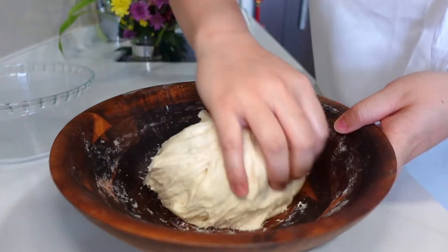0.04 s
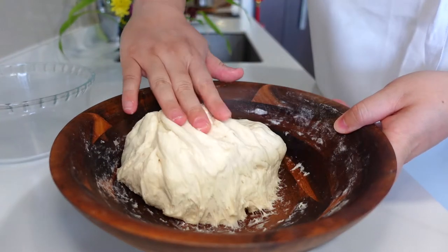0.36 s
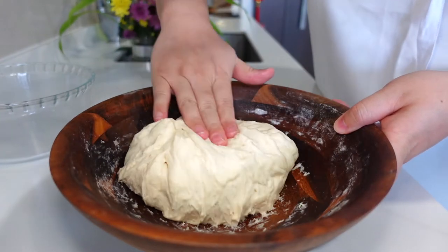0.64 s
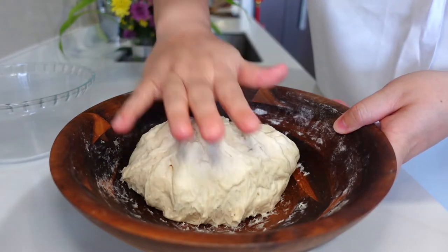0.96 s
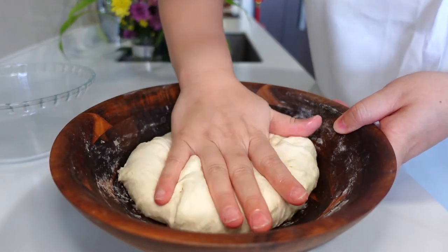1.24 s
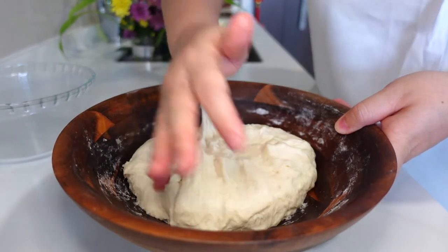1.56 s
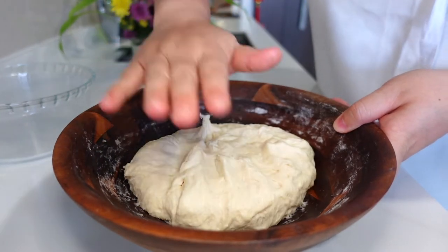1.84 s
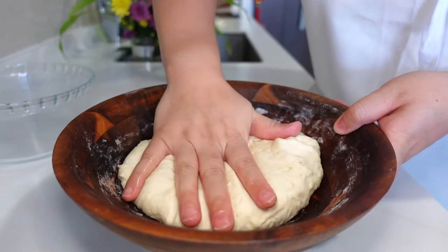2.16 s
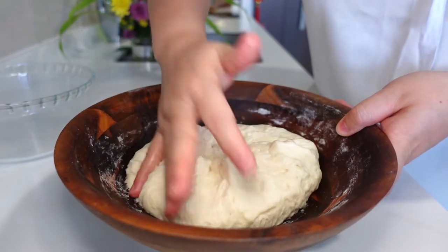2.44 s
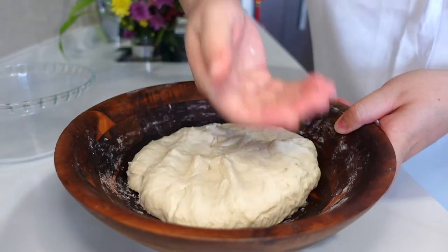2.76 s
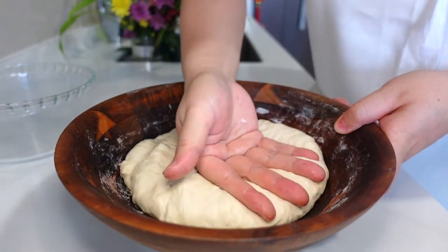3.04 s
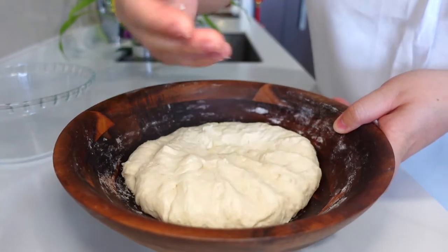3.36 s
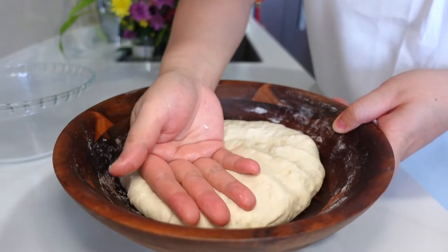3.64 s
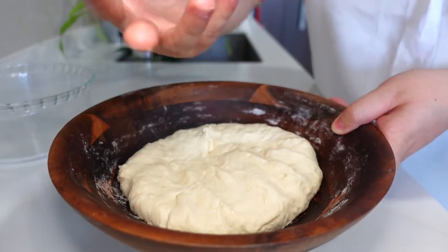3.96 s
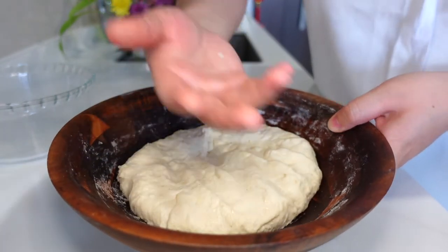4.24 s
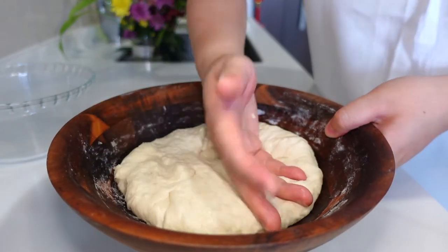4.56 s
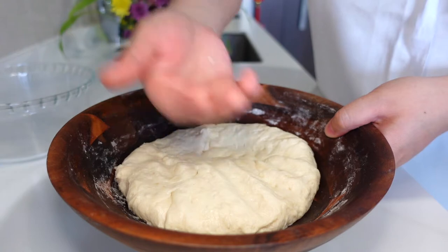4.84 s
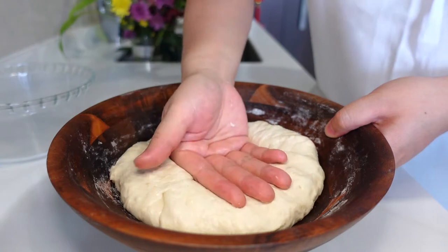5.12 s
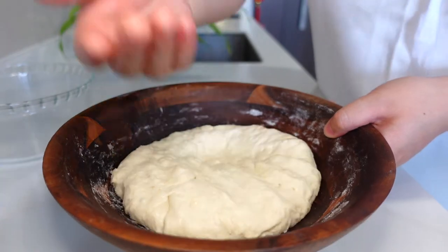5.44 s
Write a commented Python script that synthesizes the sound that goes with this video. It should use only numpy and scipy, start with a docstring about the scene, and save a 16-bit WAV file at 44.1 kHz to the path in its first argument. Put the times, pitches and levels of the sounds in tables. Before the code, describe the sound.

Close, irregular slaps of a hand on tacky dough ring briefly in a kitchen, among small sticky ticks and a low hum.

```python
"""An open hand slaps a ball of soft dough flat in a wooden bowl, close by, in a hard-walled kitchen.
Each impact cracks on the skin and excites the resonances of the bowl; some pop a pocket of trapped air.
Between slaps the tacky dough rubs, peels and ticks as its bonds with the skin break, over a low hum.
Automatic gain control flattens the hardest slaps, so that their echo stands as loud as the blow."""
import sys
import numpy as np
from scipy import signal
from scipy.fft import rfft, irfft, next_fast_len
from scipy.io import wavfile
from scipy.ndimage import uniform_filter1d, minimum_filter1d

SR = 44100
rng = np.random.default_rng(int(sys.argv[2]) if len(sys.argv) > 2 else 0)


def transcribe(signal):
    """Save signal, clipped to [-1, 1], as a 16-bit WAV file at the path in sys.argv[1]."""
    frames = np.atleast_2d(signal).T
    limited = np.clip(frames, -1, 1)
    pcm = np.round(limited * 32767).astype(np.int16)
    wavfile.write(sys.argv[1], SR, pcm)


N = 250929


def amp(db):
    """Amplitude ratio: a factor of ten for every 20 dB."""
    return 10 ** (np.asarray(db) / 20)


def unit_rms(x):
    """Normalisation to an rms of 1."""
    return x / np.sqrt(np.mean(x ** 2) + 1e-20)


def curve_at(points, hz):
    """Interpolation of a table on a logarithmic frequency axis."""
    frequency, value = np.transpose(points)
    return np.interp(np.log(hz + 1), np.log(frequency + 1), value)


def colour(x, points):
    """Zero-phase filtering by a table of (frequency [Hz], gain [dB])."""
    hz = np.fft.rfftfreq(x.shape[-1], 1 / SR)
    return irfft(rfft(x) * amp(curve_at(points, hz)), x.shape[-1])


def diffuse_field(pair, side_db):
    """Partial coherence: two independent signals mix as mid and side, as at two nearby points."""
    width = amp(curve_at(side_db, np.fft.rfftfreq(pair.shape[-1], 1 / SR)))
    mid, side = rfft(pair) * np.array([np.ones_like(width), width]) / np.sqrt(1 + width ** 2)
    return irfft(np.array([mid + side, mid - side]), pair.shape[-1])


# spectrum of the hum: (frequency [Hz], relative spectral density [dB])
HUM_SPECTRUM = [(25, -71), (45, -11), (85, -11.5), (125, 2), (210, -4.5), (300, -5), (410, -15.5),
                (520, -13), (750, -17.5), (1350, -16.5), (2200, -21), (3300, -30), (7000, -36.5),
                (16000, -48.5)]
# stereo width of the hum: (frequency [Hz], side minus mid [dB])
HUM_WIDTH = [(60, -61), (150, -24.5), (380, -8), (950, -4), (2380, -3), (5980, 1.5), (15000, -6)]
def room_hum(level_db=-48):
    """Stationary noise: a steady, diffuse hum with most of its power at low frequencies."""
    noise = colour(rng.standard_normal((2, next_fast_len(N))), HUM_SPECTRUM)
    return amp(level_db) * unit_rms(diffuse_field(noise, HUM_WIDTH))[:, :N]


# decay of the kitchen: (frequency [Hz], reverberation time T60 [s])
REVERB_TIMES = [(100, 0.66), (300, 0.64), (800, 0.59), (2500, 0.69), (5000, 0.71), (9000, 0.52),
                (15000, 0.36)]
# colour of the reverberation: (frequency [Hz], gain [dB])
REVERB_SPECTRUM = [(60, -8.5), (130, -1), (300, 0.5), (1000, 0), (3000, -2.5), (7000, -5.5), (15000, 2.5)]
# stereo width of the reverberation: (frequency [Hz], side minus mid [dB])
REVERB_WIDTH = [(60, -46), (150, -72), (380, -19), (950, -10.5), (2380, -7.5), (5980, -5.5), (15000, -7.5)]
def kitchen_reverb(build_s=0.0068):
    """Reverberation: a diffuse impulse response builds up, then decays exponentially in each band."""
    hz, t, spectra = signal.stft(rng.standard_normal((2, 2 ** 15)), SR, nperseg=256)
    decay = amp(-60 * t / curve_at(REVERB_TIMES, hz)[:, None])
    tail = signal.istft(spectra * decay, SR, nperseg=256)[1]
    tail *= 1 - np.exp(-(np.arange(tail.shape[1]) / SR / build_s) ** 2)
    return colour(diffuse_field(tail / np.linalg.norm(tail[0]), REVERB_WIDTH), REVERB_SPECTRUM)


def add(mix, start_s, sound):
    """Superposition: a sound sums into the mix from its start time on."""
    part = mix[max(round(start_s * SR), 0):][:len(sound)]
    part += sound[:len(part)]


# reflections from counter, bowl rim and body: (delay [s], gain [ratio])
REFLECTIONS = [(.0031, 0.55), (.0046, 0.24), (.0070, 0.33), (0.0109, 0.19)]
def with_reflections(x, cutoff_hz=3500):
    """Early reflection: near surfaces add delayed, duller copies to the direct sound."""
    out = x.copy()
    dulled = signal.lfilter(*signal.butter(1, cutoff_hz, fs=SR), x)
    for delay_s, gain in REFLECTIONS:
        add(out, delay_s, gain * dulled)
    return out


# quick peels of skin off dough: (centre time [s], half length [s], relative level [dB])
PEEL_STROKES = [(.005, 0.048, -40.5), (0.803, 0.045, -54.5), (1.403, 0.056, -49.5), (1.545, 0.054, -43.5),
                (2.224, 0.051, -50), (2.463, 0.063, -43.5), (3.23, 0.034, -43), (3.901, 0.033, -43.5),
                (4.635, 0.044, -43.5), (5.236, 0.026, -43)]
# slow drags of the resting hand: (centre time [s], half length [s], relative level [dB])
DRAG_STROKES = [(0.12, 0.14, -52.5), (0.426, 0.23, -66), (1.286, 0.11, -57.5), (3.035, 0.087, -62.5),
                (5.056, 0.041, -59.5), (5.619, 0.039, -59)]
# spectrum of the parting bonds: (frequency [Hz], gain [dB])
PEEL_SPECTRUM = [(400, -1), (1200, -1), (2500, 0.5), (4000, 6), (7000, 3), (10000, -1.5), (13000, -8),
                 (16000, -13)]
def peeling(grains_per_s=7000, spread_db=3, threads_per_s=70, thread_db=13, untilted_db=-44.5):
    """Shot noise: countless tiny adhesive bonds let go in soft swells, among a few thicker threads."""
    # spectral tilt in dB per octave: louder peels are duller, and all drags are bright
    strokes = [(s, half_s, db, -0.7 * (db - untilted_db)) for s, half_s, db in PEEL_STROKES]
    strokes += [(s, half_s, db, 3) for s, half_s, db in DRAG_STROKES]
    t, out = np.arange(N) / SR, np.zeros(N)
    for centre_s, half_s, level_db, tilt in strokes:
        span = t[abs(t - centre_s) < 3 * half_s]
        n = len(span)
        grains = rng.standard_normal(n) * (rng.random(n) < grains_per_s / SR)
        grains *= amp(spread_db * np.minimum(rng.exponential(1, n), 4))
        thread_sizes = amp(thread_db) * np.sin(2 * np.pi * rng.random(n))
        grains += thread_sizes * (rng.random(n) < threads_per_s / SR)
        fizz = colour(grains, [(hz, db + tilt * np.log2(hz)) for hz, db in PEEL_SPECTRUM])
        swell = np.exp(-((span - centre_s) / half_s) ** 2)
        add(out, span[0], amp(level_db) * unit_rms(fizz) * swell)
    return out


def fine_threads(per_s=30, level_db=-36, spread_db=1.5, hz=6300, spread_octaves=0.44):
    """Jittered pulse train of threads parting in each drag: (time [s], level [dB], frequency [Hz])."""
    for centre_s, half_s, _ in DRAG_STROKES:
        for k, (late, softer, pitch) in enumerate(rng.uniform(-0.87, 1, (24, 3))):
            time_s = max(centre_s - half_s, 0) + (k + 0.5 + 0.5 * late) / per_s
            if time_s < centre_s + half_s:
                yield time_s, level_db - spread_db * softer, hz * 2 ** (spread_octaves * pitch)


# the thickest threads and bubbles snap singly: (time [s], relative level [dB], frequency [Hz])
THICK_SNAPS = [(0.2261, -30.5, 4200), (0.322, -24.5, 10600), (0.6487, -26, 8300), (1.281, -30.5, 3930),
               (2.121, -31.5, 7500), (3.0090, -27.5, 4750), (3.080, -32.5, 5330), (3.569, -18.5, 2660),
               (4.3644, -27, 2117), (4.952, -22, 3800), (5.2306, -15.5, 3500), (5.572, -14.5, 4200),
               (5.581, -20.5, 3600)]
def snapping(decay_cycles=0.63, tear_s=0.0024, tear_db=-16, gain_db=1, band_hz=(1100, 12000)):
    """Damped oscillation: a breaking thread clicks for about one cycle, and its ends tear on briefly."""
    t, out = np.arange(512) / SR, np.zeros(N)
    for time_s, level_db, hz in THICK_SNAPS + list(fine_threads()):
        click = np.sin(2 * np.pi * hz * t) * np.exp(-t * hz / decay_cycles)
        tear = amp(tear_db) * rng.standard_normal(len(t)) * np.exp(-t / tear_s)
        tear[0] = 1  # the break itself
        add(out, time_s, amp(level_db + gain_db) * np.convolve(click, tear))
    return signal.lfilter(*signal.butter(2, band_hz, "band", fs=SR), out)


# flat skin meeting soft dough: (frequency [Hz], relative level [dB])
CONTACT_SPECTRUM = [(30, -36), (65, -20.5), (125, -8.5), (300, -3.5), (400, -7), (540, 0.5), (900, -4.5),
                    (1350, -10.5), (1850, -16), (3100, -19), (4300, -22.5), (7000, -29), (10000, -45),
                    (15000, -82)]
# low room booms and the resonances of the bowl on its counter: (frequency [Hz], width [Hz], lift [dB])
RESONANCES = [(83, 20.5, 15), (145.5, 57, 9.5), (195, 16, 7), (241, 47, 1.5), (311.4, 35, 5.5),
              (410.6, 27, 6), (497, 19, 3), (622.6, 13, 3), (795, 30, 4.5), (1020, 7.7, 3.5), (1125, 11, 4),
              (1650, 41, 6), (2366, 254, 7), (3800, 810, 6.5)]
def impact(pocket_hz, ring_db, crack_tilt, thump_db, pocket_octaves=0.18, squash_s=0.000744):
    """Impulse excitation: the skin cracks first, then the bowl and the low room modes resonate."""
    hz = np.fft.rfftfreq(8192, 1 / SR) + 1
    db = curve_at(CONTACT_SPECTRUM, hz)
    # the air pocket pops only where its frequency lies within hearing
    db += ring_db * np.exp(-(np.log2(hz / pocket_hz) / pocket_octaves) ** 2)
    db += sum(lift / (1 + (2 * (hz - centre) / width) ** 2) for centre, width, lift in RESONANCES)
    db += crack_tilt * np.log2(1 + hz / 600)  # tilt in dB per octave
    db += thump_db / (1 + (hz / 330) ** 4)
    # minimum phase makes the pulse causal; its lows lag while the dough gives way
    log_gain = np.log(amp(np.r_[db, db[-2:0:-1]]))
    spectrum = np.exp(np.conj(signal.hilbert(log_gain)))[:len(hz)]
    group_delay_s = squash_s / (1 + (hz / 1500) ** 2)
    phase_lag = 2 * np.pi * np.cumsum(group_delay_s) * (hz[1] - hz[0])
    pulse = -irfft(spectrum * np.exp(-1j * phase_lag))
    pulse *= np.cos(np.linspace(0, np.pi / 2, len(pulse))) ** 2
    return pulse / np.linalg.norm(pulse)


def patchy_contact(blow, crossover_hz=1400, spread_s=0.0023):
    """Interference: skin lands patch by patch, so the lows add in phase and the highs scatter in time."""
    t = np.arange(1024) / SR
    patches = rng.standard_normal(len(t)) * np.exp(-t / spread_s)
    patches /= np.linalg.norm(patches)
    lows = signal.lfilter(*signal.butter(2, crossover_hz, "low", fs=SR), blow)
    highs = signal.lfilter(*signal.butter(2, crossover_hz, "high", fs=SR), blow)
    return lows + signal.fftconvolve(highs, patches)[:len(blow)]


# soft pushes on the dough: (time [s], relative force [dB], bass gain [dB])
BOWL_NUDGES = [(.062, -22, -1), (.114, -22, -1), (4.3984, -12, 13), (4.6700, -15.5, 9), (4.957, -15, 15),
               (5.0136, -22, 26), (5.5810, -10.5, 16), (5.6612, -9, 3)]
def nudges(reverb_db=2):
    """Weak impacts: each push knocks the bowl on the counter. Yields time, pulse and reverb gain."""
    for time_s, force_db, thump_db in BOWL_NUDGES:
        pulse = impact(pocket_hz=646, ring_db=5, crack_tilt=-0.6, thump_db=thump_db)
        yield time_s, amp(force_db) * pulse, reverb_db


# the hand lands, often fingers before palm: (time [s], relative force [dB], cupping [0 flat, 1 hollow])
HAND_SLAPS = [(1.5768, 13.5, 0.59), (1.6432, 10.5, 0.83), (2.5540, 8.5, 0.62), (2.5610, -0.5, 0.55),
              (3.2832, 16, 0.03), (3.9751, 14.5, 0.01), (4.4548, 11, 0.79), (4.4622, 1.5, 1),
              (5.2950, 4, 0.68), (5.3003, 6.5, .45), (5.3445, 17, .75)]
def slaps(firm_db=13, firm_pocket_hz=685, octaves_per_db=1.48):
    """Nonlinear contact: harder slaps crack brighter; cupped slaps sound duller and drier."""
    for time_s, force_db, cupping in HAND_SLAPS:
        harder_db = force_db - firm_db
        pulse = impact(pocket_hz=firm_pocket_hz * 2 ** (octaves_per_db * harder_db),
                       ring_db=-0.5 + 8.5 * cupping,
                       crack_tilt=1.19 + 0.2333 * harder_db - 3.3 * cupping,
                       thump_db=-3.5 - 0.37 * harder_db)
        reverb_db = 3.5 - 11 * cupping  # a flat hand sprays its crack into the room
        yield time_s, amp(force_db) * pulse, reverb_db


def scene(direct_db=1, sticky_db=-3, sticky_reverb_db=-4):
    """Superposition of direct and diffuse sound: each blow rings out in the kitchen's reverberation."""
    out = np.zeros((2, N))
    tails = [kitchen_reverb() for _ in range(4)]  # random draws of the same room
    for k, (time_s, blow, reverb_db) in enumerate([*slaps(), *nudges()]):
        direct = amp(direct_db) * with_reflections(patchy_contact(blow))
        echoes = amp(reverb_db) * signal.fftconvolve(blow[None], tails[k % len(tails)], axes=1)
        for channel, echo in zip(out, echoes):
            add(channel, time_s, direct)
            add(channel, time_s, echo)
    sticky = amp(sticky_db) * (peeling() + snapping())
    sticky_echo = amp(sticky_reverb_db) * signal.oaconvolve(sticky[None], tails[0], axes=1)[:, :N]
    return out + with_reflections(sticky) + sticky_echo + room_hum()


# unequal sensitivity of the two channels: (frequency [Hz], left minus right [dB])
CHANNEL_BALANCE = [(200, 0), (500, -0.2), (1000, -1), (4000, -0.8), (12000, 0.4)]
def record(dry, hold_db=-19.5, hold_s=0.018, hold_share=0.34, limit_db=-11, ratio=6,
           recover_db_per_s=900, low_cut_hz=52, high_cut_hz=15900):
    """Dynamic range compression: gain control and a limiter, then channel balance and band limits."""
    # sustained loudness is turned down gradually
    pole = np.exp(-1 / (hold_s * SR))
    power_db = 10 * np.log10(signal.lfilter([1 - pole], [1, -pole], (dry ** 2).mean(0)) + 1e-12)
    held = dry * amp(-hold_share * np.maximum(power_db - hold_db, 0))
    # single peaks are caught at once, by a smoothed gain that looks ahead
    peak_db = 20 * np.log10(abs(held).max(0) + 1e-9)
    fall_db = np.arange(N) * recover_db_per_s / SR
    envelope_db = np.maximum.accumulate(peak_db + fall_db) - fall_db
    over_db = np.maximum(envelope_db - limit_db, 0)
    over_db = -minimum_filter1d(-over_db, size=60)
    over_db = uniform_filter1d(uniform_filter1d(over_db, size=70), size=50)
    limited = held * amp(-over_db * (1 - 1 / ratio))
    balance_db = curve_at(CHANNEL_BALANCE, np.fft.rfftfreq(2 ** 18, 1 / SR))
    sound = irfft(rfft(limited, 2 ** 18) * amp(np.outer([0.5, -0.5], balance_db)))[:, :N]
    sound = signal.sosfilt(signal.butter(2, low_cut_hz, "high", fs=SR, output="sos"), sound)
    low_pass = signal.firwin(511, high_cut_hz, window=("kaiser", 9), fs=SR)
    return signal.oaconvolve(sound, low_pass[None], "same")


dry = scene()
out = record(dry)
transcribe(out)
```